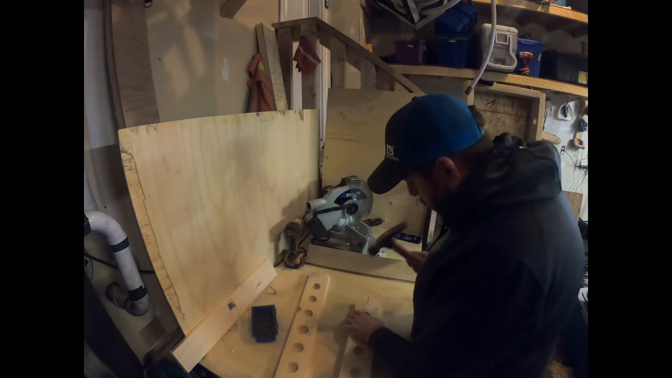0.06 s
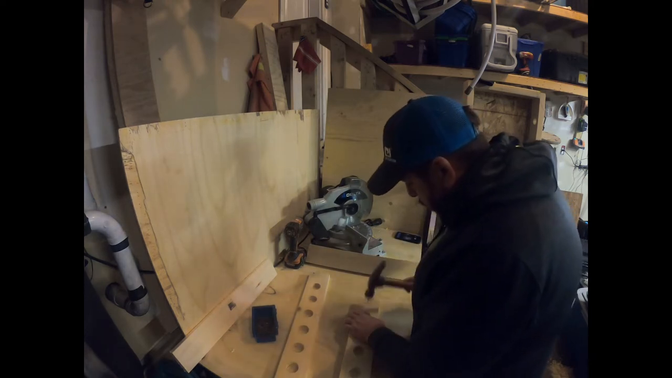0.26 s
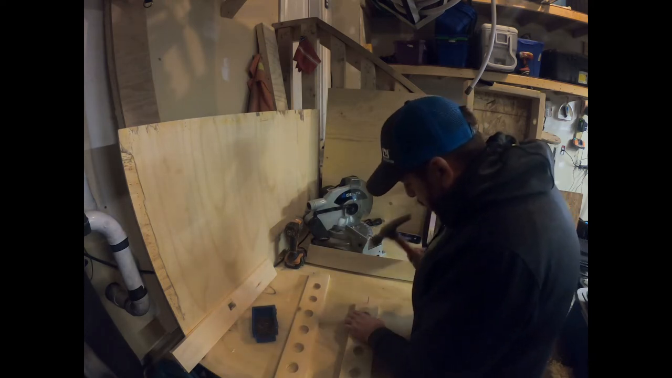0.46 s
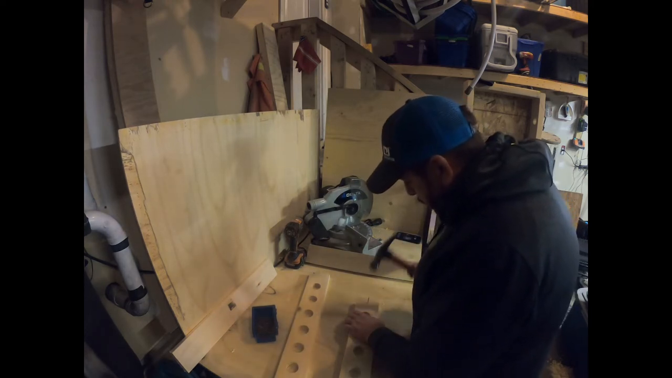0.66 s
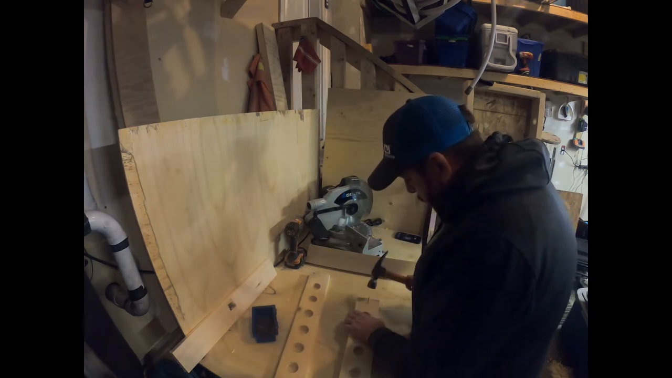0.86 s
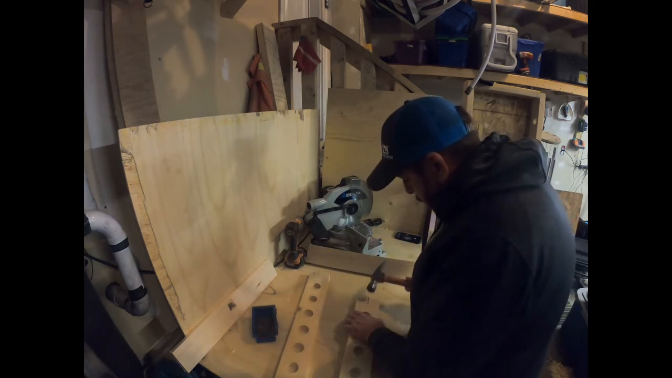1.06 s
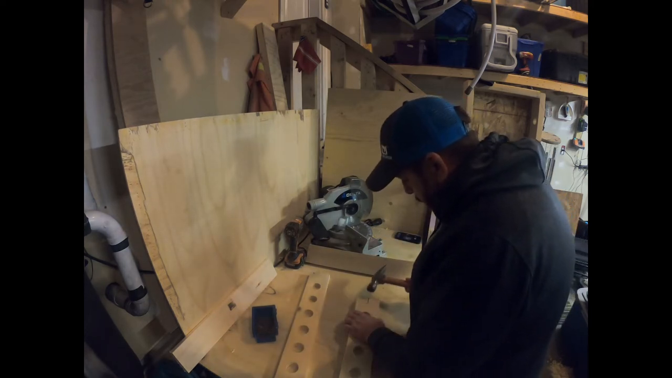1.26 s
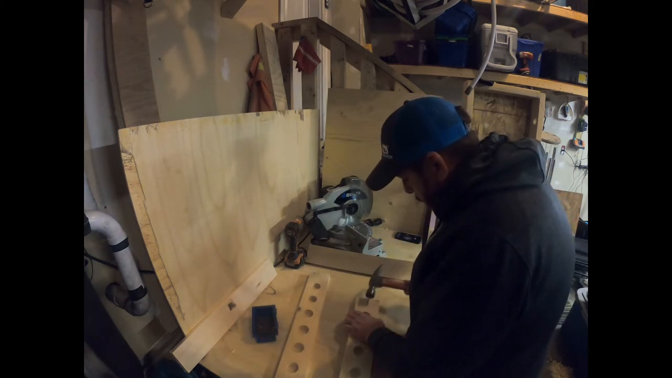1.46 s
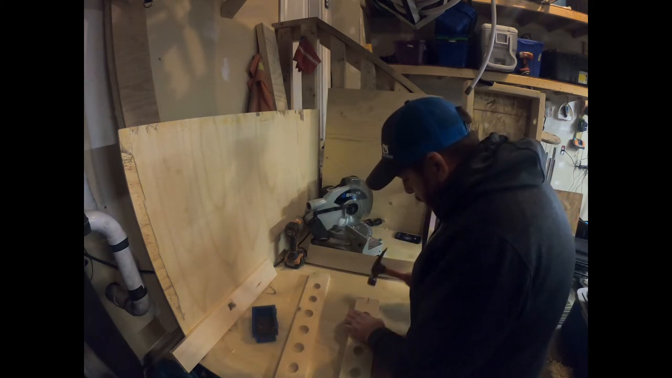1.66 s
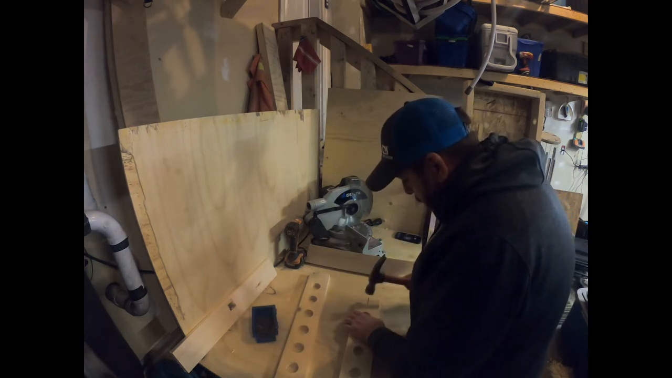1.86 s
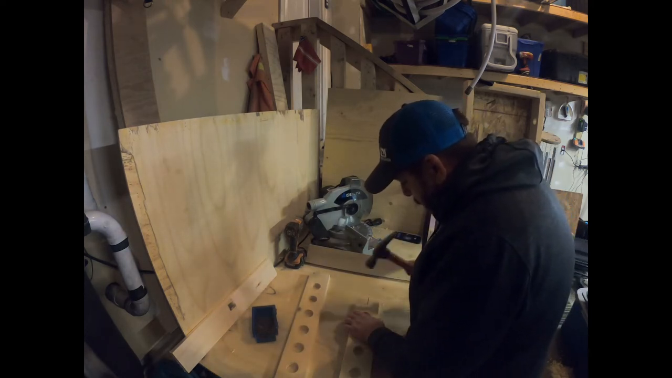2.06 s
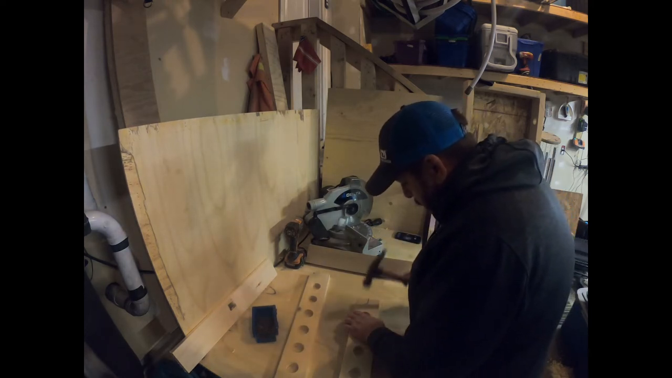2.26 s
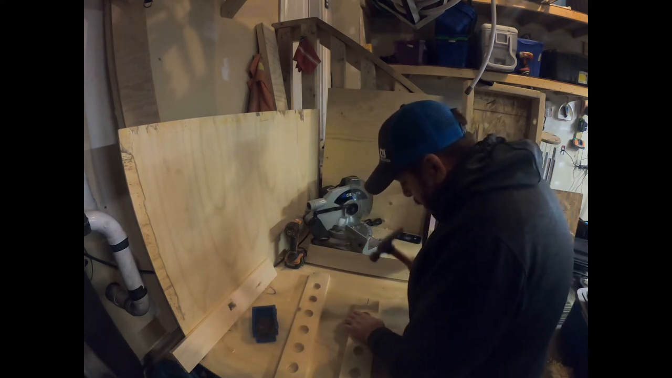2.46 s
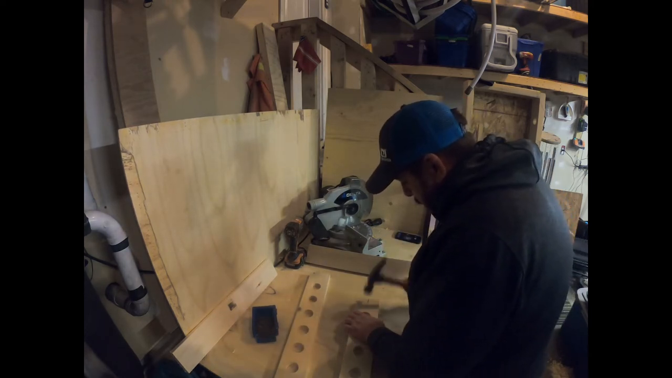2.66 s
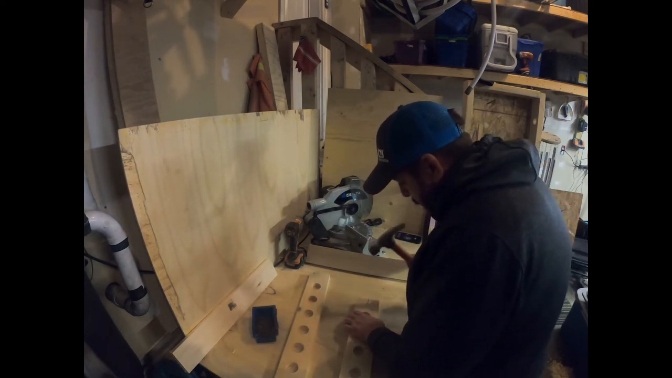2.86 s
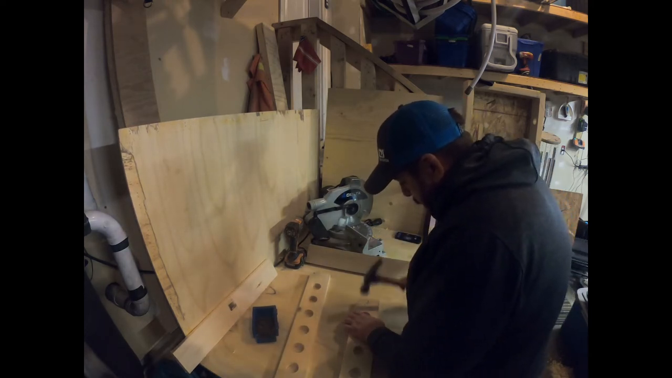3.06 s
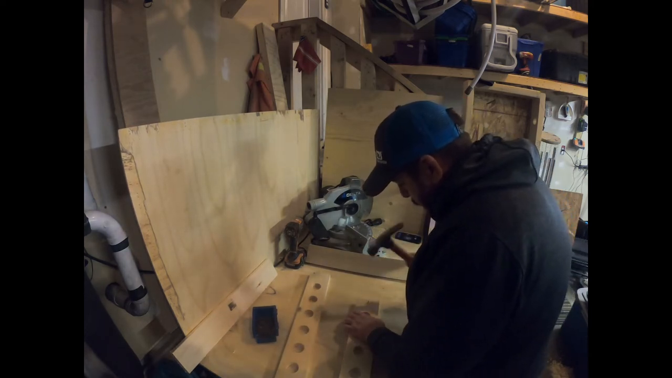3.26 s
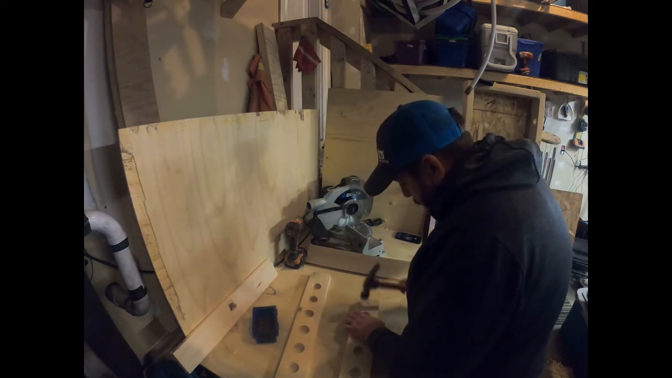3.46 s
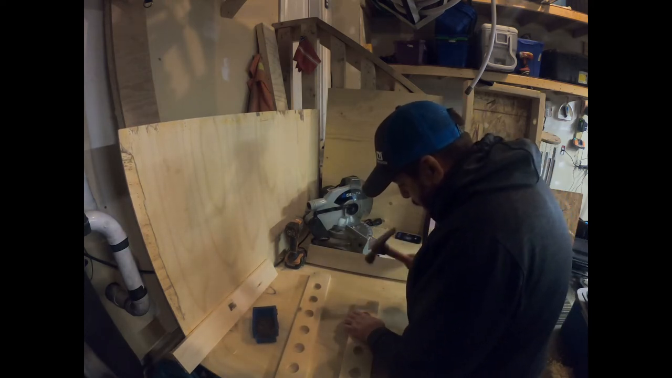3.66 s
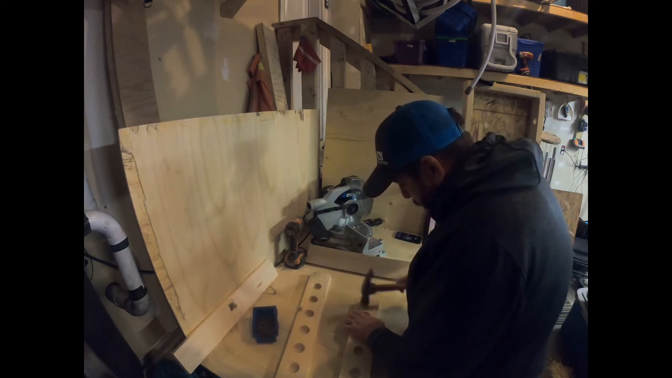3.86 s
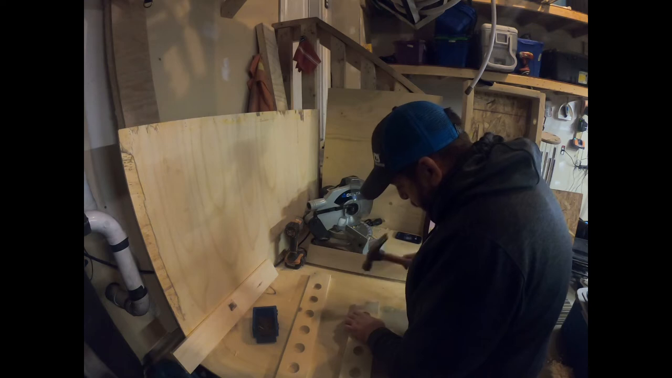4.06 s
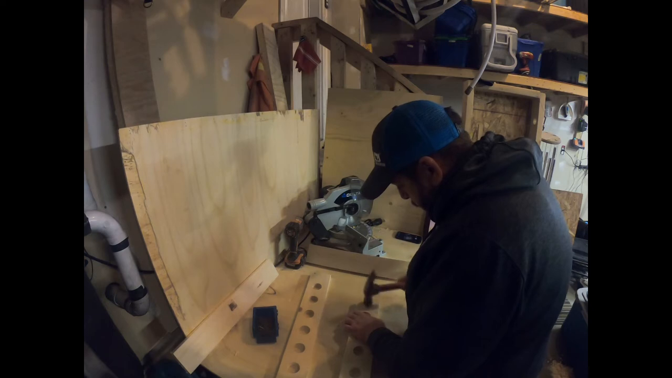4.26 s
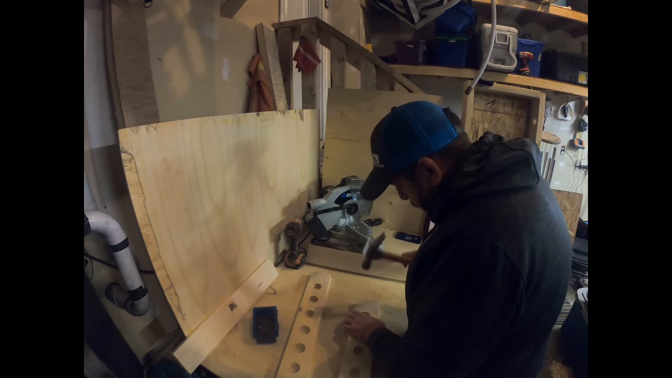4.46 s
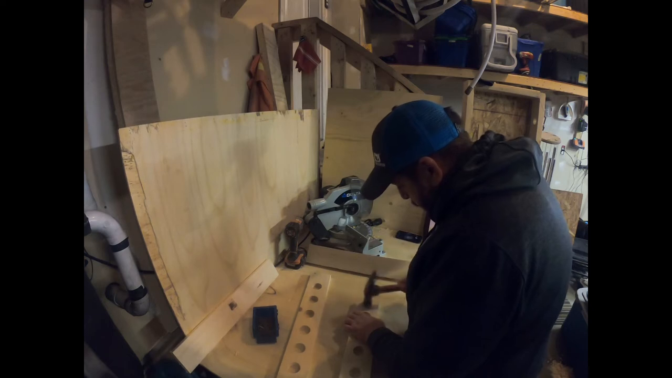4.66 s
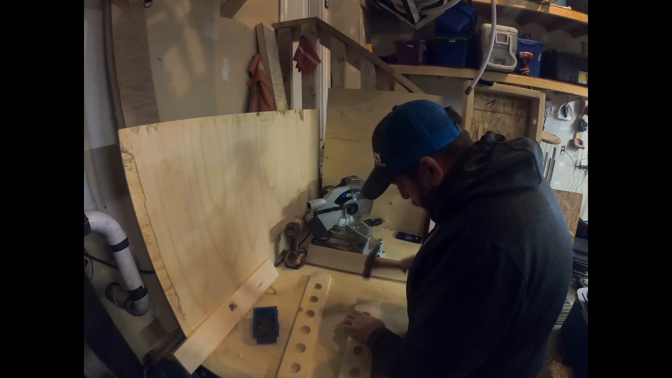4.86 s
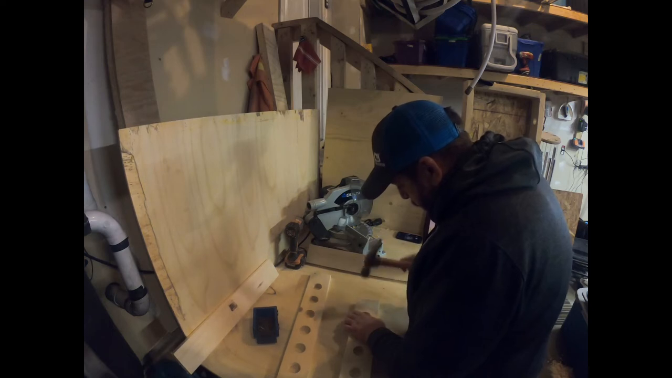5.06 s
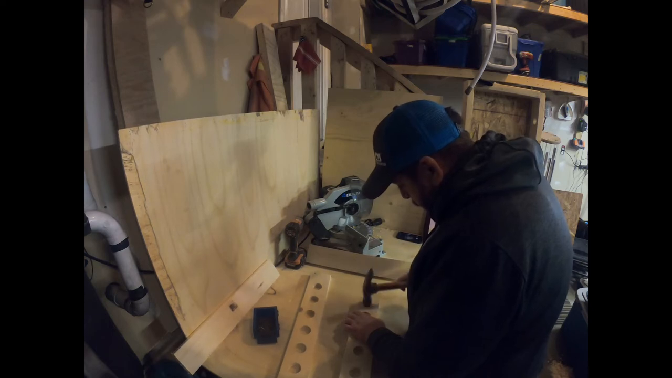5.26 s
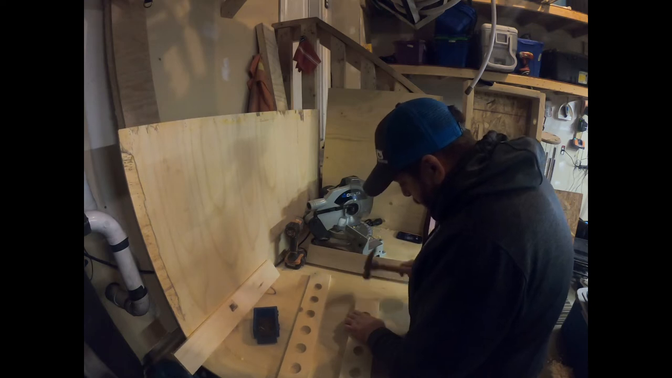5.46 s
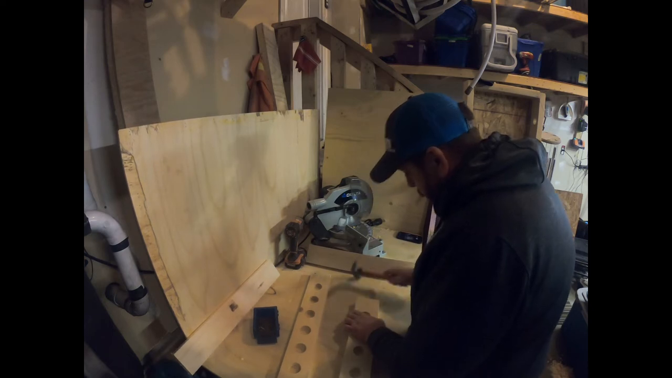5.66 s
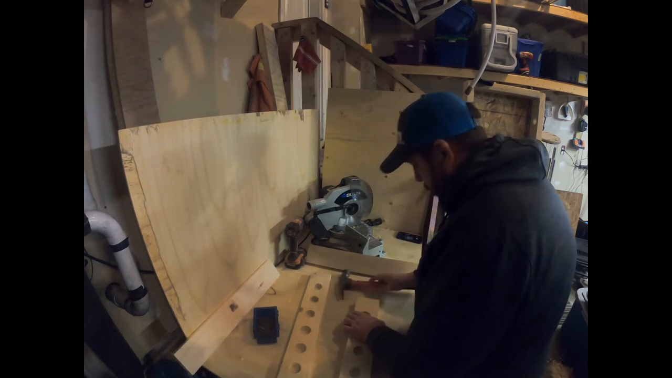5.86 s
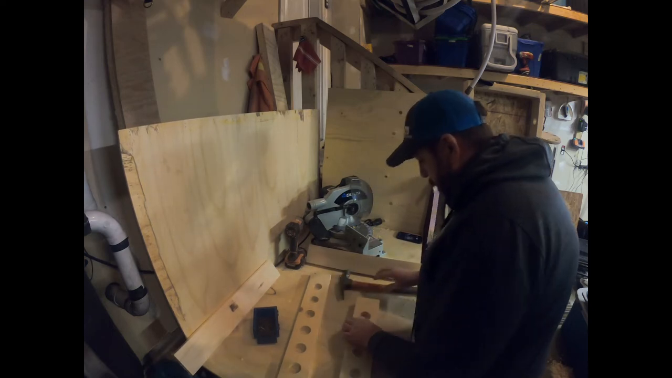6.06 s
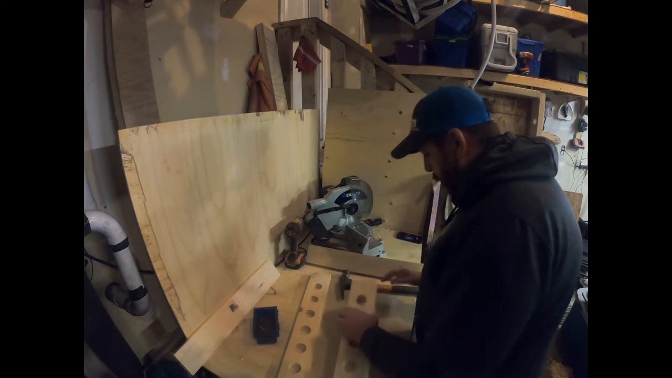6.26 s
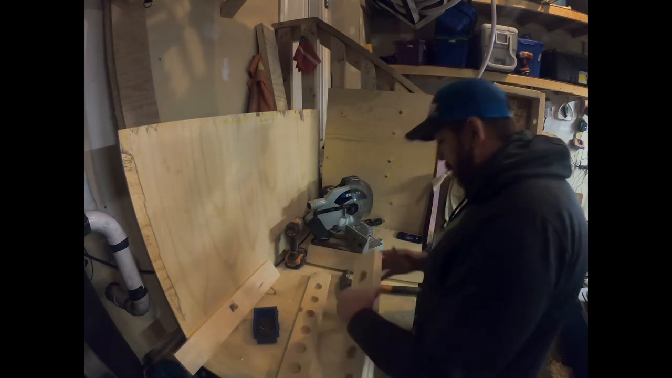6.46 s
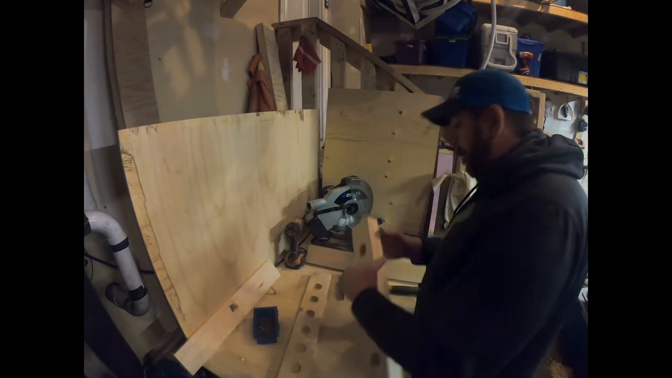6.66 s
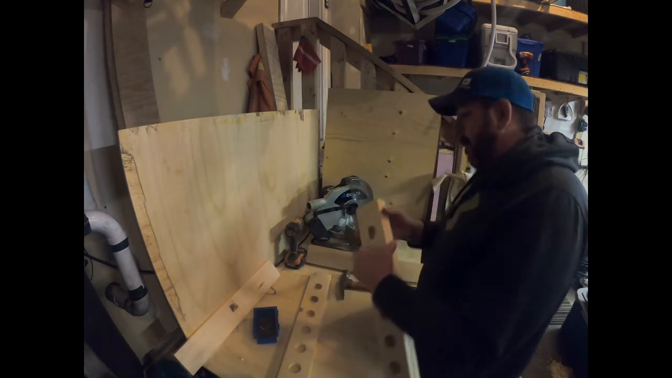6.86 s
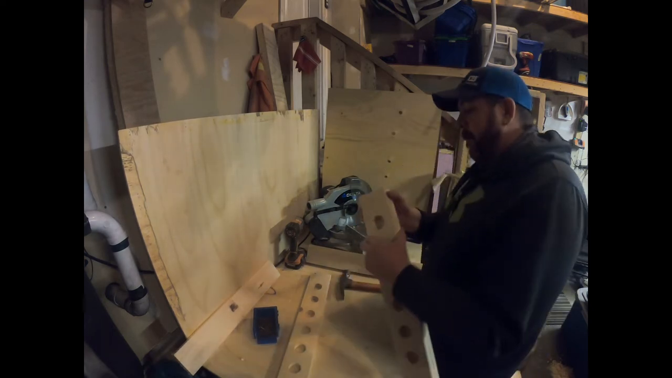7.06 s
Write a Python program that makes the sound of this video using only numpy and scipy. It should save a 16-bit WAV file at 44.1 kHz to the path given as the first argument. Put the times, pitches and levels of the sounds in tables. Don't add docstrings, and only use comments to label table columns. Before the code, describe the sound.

Nailing on a bench, picked up by a small stereo recorder nearby with faint hiss and a low room drone. Blows crack, thump and rattle the loose board, with short woody room tails, slightly squashed and dull on top. After one blow and two soft taps comes a steady run, the last blow softer-edged. The hammer knocks down on the bench, and wood drags away among rustling clothes.

```python
import sys
import numpy as np
from scipy import signal
from scipy.fft import rfft, irfft
from scipy.io import wavfile
from scipy.ndimage import uniform_filter1d

SR = 44100
rng = np.random.default_rng(int(sys.argv[2]) if len(sys.argv) > 2 else 0)


def ratio(d):
    e = np.asarray(d, float) / 20
    return 10 ** e


def wav_out(sig):
    wavfile.write(sys.argv[1], SR, np.round(np.clip(np.atleast_2d(sig).T, -1, 1) * 32767).astype(np.int16))


N = 313110

# pitch_hz, t60_s
ROOM_T60 = [(60, 0.52), (110, 0.74), (150, 0.54), (280, 0.56), (400, 0.39), (1000, 0.41), (3000, 0.44),
            (8000, 0.29)]
# pitch_hz, correlation
LIKENESS = [(40, .997), (170, .996), (350, .97), (700, .73), (1400, .56), (2800, .74), (5600, .3),
            (10000, -.07), (14000, -.3)]
# pitch_hz, left_minus_right_db
LEAN = [(100, 0), (350, 0), (700, -2.2), (1400, 0.4), (2800, -1.5), (5600, 1.5), (10000, -0.5),
        (14000, -1.3)]
# start_s, strength_db, weight_db (mass behind it), hardness_db (of contact)
FULL = [
    (0.2485, -14, 2, -2),
    (2.2075, -13, -1, -2),
    (2.6225, -16.5, 2.5, 1.5),
    (3.024, -16.5, 1.5, 2.5),
    (3.4275, -16.5, 2.5, 0.5),
    (3.836, -16, 0, 0),
    (4.2435, -15, 0, -.5),
    (4.6705, -13.5, -4, -1.5),
    (5.197, -11, -7.5, -4.5),
]
# start_s, strength_db, weight_db, hardness_db, knock_over_strength_db
TAPS = [
    (1.1752, -22, -11, -3, -4),
    (1.4909, -23.5, 7, 2, 5),
]
# start_s, strength_db, weight_db, hardness_db, knock_over_strength_db
DROPS = [
    (5.711, -18.5, -1, -2, 10),
    (5.8285, -21, -2, -8, 6),
    (5.8915, -9, -4, 5.5, -1),
    (6.007, -13, 5, -3, -3),
    (6.565, -72, 27, 3, 4),
]
# thump_db, bench_db, board_db, crack_db, tick_db
FULL_PARTS = (-1.5, 0.5, 0, 2.5, -13)
TAP_PARTS = (-18, -4, 0, -3, -10.5)
DROP_PARTS = (-17.5, -1.5, -0.5, -10.5, -26.5)


def blow_levels(rows, parts_db, ring_share):
    blows = []
    for s, strength, weight, hard, *knock in rows:
        levels_db = strength + np.array(parts_db) + [weight, 0.33 * weight, 0, hard, 0.72 * hard]
        knock_db = strength + (knock[0] if knock else -150)
        blows.append((s, ring_share, *levels_db, knock_db))
    return blows


FULL_BLOWS = blow_levels(FULL, FULL_PARTS, 1.02)
BLOWS = FULL_BLOWS + blow_levels(TAPS, TAP_PARTS, .76) + blow_levels(DROPS, DROP_PARTS, .67)
START_S, RING_SHARE, THUMP_DB, BENCH_DB, BOARD_DB, CRACK_DB, TICK_DB, KNOCK_DB = np.transpose(BLOWS)
IS_FULL = RING_SHARE > .9
IS_TAP = np.isin(START_S, np.array(TAPS)[:, 0])


def at_hz(points, hz):
    table = np.array(points)
    return np.interp(np.log(hz), np.log(table[:, 0]), table[:, 1])


def rms_one(x):
    return x / np.sqrt(np.mean(x ** 2) + 1e-20)


def drift(rate, size):
    r = np.exp(-64 * np.pi * rate / SR)
    slow = signal.lfilter([1], [1, -2 * r, r * r], rng.standard_normal(size // 32 + 1002))
    slow = rms_one(slow[1000:])
    return np.interp(np.arange(size) / 32, np.arange(len(slow)), slow)


def band_filter(x, order, cut_hz, kind):
    return signal.sosfilt(signal.butter(order, cut_hz, kind, fs=SR, output="sos"), x)


def bands(size, patchy_db=0.):
    edges = 32 * 2 ** np.arange(0, 9.1, .5)
    white = rng.standard_normal((2, 2, size))
    flicker = [drift(42.0, size) for k in range(3)]
    for k, (low, high) in enumerate(zip(edges, edges[1:])):
        mid, side = band_filter(white[k % 2], 2, [low, high], "band")
        hz = np.sqrt(low * high)
        alike = np.clip(at_hz(LIKENESS, hz), -1, 1)
        lean_db = at_hz(LEAN, hz) / 2 * np.array([[1], [-1]])
        gain = ratio(patchy_db * flicker[k % 3] + lean_db)
        yield hz, gain * (np.sqrt(1 + alike) * mid + np.sqrt(1 - alike) * side * [[1], [-1]])


def coloured(spectrum, patchy_db):
    return rms_one(sum(ratio(at_hz(spectrum, hz)) * noise for hz, noise in bands(N, patchy_db)))


def resonate(x, hz, width_hz):
    r = np.exp(-np.pi * width_hz / SR)
    return rms_one(signal.lfilter([1, 0, -1], [1, -2 * r * np.cos(2 * np.pi * hz / SR), r * r], x))


def strike(modes, levels_db, late_s, rise_s, vary_db, detune, turn_by=np.pi):
    out = np.zeros((2, N + SR))
    t = np.arange(SR)[:, None] / SR
    hz, db, t60 = np.transpose(modes)
    apart = np.arccos(np.clip(at_hz(LIKENESS, hz), -1, 1)) * rng.choice([-.5, .5], len(modes))
    turn = turn_by * np.arange(len(modes))
    for s, share, level_db in zip(START_S, RING_SHARE, levels_db):
        strength, pitch = rng.standard_normal((2, len(modes)))
        if level_db < -120:
            continue
        span = t[:round(min(share * t60.max(), 1) * SR)]
        turning = 2j * np.pi * hz * (1 + detune * pitch)
        dying = np.log(1000) / (share * t60)
        rings = np.exp(span * (turning - dying)) * (1 - np.exp(-span / rise_s))
        at = round((s + late_s) * SR)
        for ear, sign in enumerate((1, -1)):
            gain = ratio(level_db + db + vary_db * strength + sign * at_hz(LEAN, hz) / 2)
            phase = np.exp(1j * (turn + sign * apart))
            out[ear, at:at + len(span)] += np.imag(rings @ (gain * phase))
    return out[:, :N]


def air():
    # pitch_hz, level_db (per Hz)
    hiss_colour = [(30, 4), (60, -3), (100, -11), (250, -3), (450, -13), (650, -4.5), (1000, -13.5),
                   (3000, -21.5), (6500, -23.5), (8000, -15.5), (9200, -22.5), (11000, -15.5),
                   (15000, -23.5)]
    hiss_db, drone_db, drone_t60_s = -76, -76, 2.6
    t = np.arange(N) / SR
    power = ratio(drone_db - 13.5 * np.maximum(t - 5.9, 0)) ** 2
    power = power + ratio(-64 - 60 * t / drone_t60_s) ** 2
    for s, share, thump_db, *rest in FULL_BLOWS:
        power = power + (t > s) * ratio(thump_db - 35 - 60 * np.abs(t - s) / drone_t60_s) ** 2
    drone = resonate(resonate(rng.standard_normal(N), hz=152, width_hz=32), hz=155, width_hz=79)
    drone = band_filter(drone, 4, 135, "high")
    sizzle = resonate(rng.standard_normal((2, N)), hz=8150, width_hz=920)
    hiss = coloured(hiss_colour, patchy_db=3.0)
    return ratio(hiss_db - 8.5) * sizzle + ratio(hiss_db) * hiss + np.sqrt(power) * drone


def tick_and_crack():
    # pitch_hz, level_db, t60_s
    tick_modes = [(4500, 1, 0.0087), (5115, -4.5, 0.0094), (6300, 0, 0.014), (7050, 4, 0.0053),
                  (8200, -5, 0.0059), (8340, -4, 0.012), (8740, -3, 0.0082), (10400, -5.5, 0.0022),
                  (13560, -2.5, .005)]
    # pitch_hz, level_db, t60_s
    crack_modes = [(1830, -0.5, 0.011), (2176, -7.5, 0.054), (2609, 4, 0.0055), (2930, 2.5, 0.0093),
                   (3425, -12.5, 0.016), (3690, -10.5, 0.017)]
    tick = strike(tick_modes, TICK_DB + 5.0, late_s=.0001, rise_s=0.00039, vary_db=4.0, detune=0.014)
    crack = strike(crack_modes, CRACK_DB + 4.5, late_s=.0001, rise_s=.0005, vary_db=0.87, detune=0.023)
    sharp = ratio(1.8 * np.array([[1], [-1]])) * tick + crack
    return sharp + ratio(-0.5) * np.roll(sharp, round(0.001193 * SR), axis=1)


def hammer_face():
    # pitch_hz, level_db, t60_s
    face_modes = [(690, 1.5, 0.02), (560, -4, 0.017)]
    face_db = BOARD_DB - 3 + 1.8 * (BOARD_DB - CRACK_DB)
    return strike(face_modes, np.where(IS_FULL, face_db, -150), late_s=0.00042, rise_s=.0005, vary_db=2.0, detune=.02)


def nail_song():
    # pitch_hz, level_db, t60_s
    nail_modes = [(1440, -1, .9), (2930, -2.5, 1)]
    song_db = CRACK_DB - 62 + 4.9 * START_S
    return strike(nail_modes, np.where(IS_FULL, song_db, -150), late_s=.001, rise_s=.002, vary_db=2.5, detune=.002)


def board():
    # pitch_hz, level_db, t60_s
    board_modes = [(366, -9, 0.034), (406, -5, 0.09), (510, -2, 0.048), (600.4, 0, 0.069), (730, -5, 0.096),
                   (834.4, -3.5, 0.093), (927, 0.5, 0.022), (1214, 3, 0.048), (1443, -8, .05),
                   (1560, -7, 0.063)]
    # pitch_hz, level_db, t60_s
    loose_modes = [(1287, 2, .2), (738, -5, .18), (930, -7, .2), (1960, -9, .2), (6000, -16, .22)]
    loose_db = np.where(IS_TAP, BOARD_DB - 3, -150)
    return (strike(board_modes, BOARD_DB - 5.0, late_s=0.00023, rise_s=0.0012, vary_db=3.5, detune=.01)
            + strike(loose_modes, loose_db, late_s=.008, rise_s=.03, vary_db=1, detune=.004))


def bench():
    # pitch_hz, level_db, t60_s
    bench_modes = [(135.2, -4, 0.52), (150.2, 2, .3), (158.7, -16, 0.76), (168, -4, 0.15),
                   (214, -9.5, 0.37), (254.8, -5.5, 0.44), (298, -14.5, 0.63)]
    # pitch_hz, level_db, t60_s
    thump_modes = [(46.7, -8.5, 0.3), (73.3, 0.5, 0.24), (95.6, 0, 0.2)]
    # pitch_hz, level_db, t60_s
    knock_modes = [(163, -1, 0.15), (245, -4, .1), (380, -6, 0.041), (695, -12, 0.051)]
    top_db = BENCH_DB - 3.5 - 7 * ~IS_FULL
    return (strike(knock_modes, KNOCK_DB, late_s=0.0013, rise_s=0.0012, vary_db=1.5, detune=0.017, turn_by=0)
            + strike(bench_modes, top_db, late_s=.003, rise_s=0.0021, vary_db=1.27, detune=0.015, turn_by=0)
            + strike(thump_modes, THUMP_DB + .5, late_s=0.0023, rise_s=0.0011, vary_db=2.07, detune=0.041, turn_by=0))


def reverberation():
    part_hz = [65, 190, 700, 2500, 7000]
    # pitch_hz, level_db
    tail_colour = [(32, -21.5), (60, -14.5), (150, -13), (300, -10.5), (600, -12.5), (1000, -13),
                   (2000, -16), (3500, -16), (6000, -12), (9000, -7.5), (13000, -19.5)]
    out, step = 0, 16
    t = np.arange(0, SR, step) / SR
    swell = 1 - np.exp(-t / .005)
    for hz, noise in bands(N, patchy_db=1.5):
        power = np.zeros((N + SR) // step + 1)
        for s, share, *parts_db in BLOWS:
            level_db = at_hz(list(zip(part_hz, parts_db)), hz) + at_hz(tail_colour, hz)
            age = t / (share * at_hz(ROOM_T60, hz))
            dying = ratio(level_db - 56.75 * age - 24 * age ** 3.2) * swell
            power[round(s * SR / step):][:len(t)] += dying ** 2
        out = out + np.repeat(np.sqrt(power), step)[:N] * rms_one(noise)
    return out


def clatter():
    # start_s, peak_db
    landings = [
        (0.3048, -18),
        (2.2682, -17),
        (2.6851, -20),
        (3.0987, -19.5),
        (3.5002, -17.5),
        (3.9177, -16.5),
        (4.3208, -18.5),
        (4.753, -18.5),
        (5.249, -26),
    ]
    # start_s, peak_db, dull_db
    rattles = [
        (0.3131, -25.5, -8.5),
        (0.9266, -74, -10),
        (4.2768, -36.5, 12),
        (4.9681, -48.5, -6),
        (5.045, -55, 3),
        (5.7211, -30.5, 5),
        (5.832, -39.5, 3.5),
        (6.0199, -40, 3),
        (6.478, -42, -19),
    ]
    # pitch_hz, level_db
    contact_colour = [(300, 1), (1000, -4.5), (3000, 3), (6000, -5), (9000, -8), (11000, -18.5),
                      (15000, -12.5)]
    loudness = ratio(2.3 * np.minimum(rng.exponential(1, N), 4))
    grains = rng.standard_normal(N) * loudness * (rng.random(N) < .3)
    hz = np.fft.rfftfreq(N, 1 / SR) + 1
    bright = rms_one(irfft(rfft(grains) * ratio(at_hz(contact_colour, hz)), N))
    dull = rms_one(band_filter(grains, 2, [250, 1500], "band"))
    out, t = np.zeros(N), np.arange(SR // 8) / SR
    touches = [(*row, -3, 0.0095) for row in landings] + [(*row, 0.013) for row in rattles]
    for s, peak_db, dull_db, spread_s in touches:
        at = round((s - .002) * SR)
        shape = (1 - np.exp(-t / 0.0024)) * np.exp(-t / spread_s)
        out[at:at + len(t)] += ratio(peak_db) * shape * (bright + ratio(dull_db) * dull)[at:at + len(t)]
    return out


def workshop(x):
    # pitch_hz, level_db
    room_colour = [(60, -20), (200, -1.5), (600, 3), (1500, -1), (3500, -4), (6000, -4), (9000, 6),
                   (13000, 8)]
    t = np.arange(SR) / SR
    response = sum(ratio(at_hz(room_colour, hz) - 60 * t / at_hz(ROOM_T60, hz)) * noise for hz, noise in bands(SR))
    response = response * (1 - np.exp(-t / 0.0017))
    return signal.fftconvolve(x[None], response / np.sqrt(np.sum(response ** 2) / 2), axes=1)[:, :N]


def clothes():
    # start_s, level_db
    moving = [
        (4.8, -82),
        (5.0, -78),
        (5.15, -78),
        (5.6, -71),
        (6.44, -67),
        (6.51, -58),
        (6.6, -68.5),
        (6.85, -65),
        (7.1, -73),
    ]
    # pitch_hz, level_db (per Hz)
    cloth_colour = [(88, -56), (150, -9), (318, -4.5), (604, -6.5), (810, -3.5), (3640, -8), (8470, -17.5),
                    (12000, -43), (15600, -73), (22000, -120)]
    moving_db = np.interp(np.arange(N) / SR, *np.transpose(moving), left=-140)
    return ratio(moving_db + 4.5) * coloured(cloth_colour, patchy_db=1.7)


def slide():
    # start_s, length_s, scrape_db, low_squeak_db, high_squeak_db
    strokes = [
        (6.295, .14, -57.5, -63, -86),
        (6.421, 0.17, -52, -55.5, -67.5),
        (6.677, .14, -76.5, -76, -62.5),
        (6.797, 0.12, -65.5, -78, -75),
    ]
    # pitch_hz, width_hz, level_db
    slide_modes = [(206, 61, -4.5), (320, 92, 2.5), (520, 63, -11), (770, 60, -3.5), (1300, 390, -6)]
    # pitch_hz, width_hz
    squeak_modes = [(2480, 80), (3600, 70)]
    start, length, *levels_db = np.transpose(strokes)
    progress = np.clip((np.arange(N)[:, None] / SR - start) / length, 0, 1)
    push = np.sin(np.pi * progress) ** 1.03
    scrape, *squeak = (push @ ratio(db) for db in levels_db)
    clicks = rng.random(N) < 2500 / SR
    grit = rng.standard_normal(N) * clicks * ratio(3.5 * drift(60., N))
    rubbed = rms_one(sum(ratio(db) * resonate(grit, hz, width_hz) for hz, width_hz, db in slide_modes))
    squeaks = sum(ratio(-3.5) * gain * resonate(grit, *mode) for gain, mode in zip(squeak, squeak_modes))
    return ratio(-4.5) * scrape * rubbed + squeaks


def scene():
    blows = tick_and_crack() + hammer_face() + nail_song() + board() + bench()
    small = clatter() + slide()
    in_room = ratio(-1.5) * small + ratio(0.5) * workshop(small)
    return air() + blows + reverberation() + in_room + clothes()


def top_cut(x):
    return signal.sosfilt(signal.butter(12, 16470, fs=SR, output="sos"), x)


def record(dry):
    step = round(.0108 * SR)
    leak = band_filter(dry, 1, 2500, "low")
    x = dry + ratio(-20.0) * np.roll(leak, -step, axis=1) + ratio(-31.5) * np.roll(leak, -2 * step, axis=1)
    x = ratio(-26.0) * x + band_filter(x, 6, 9400, "low")
    x = band_filter(x, 4, 38, "high")
    bass = signal.sosfiltfilt(signal.butter(3, 125, fs=SR, output="sos"), x)
    power = uniform_filter1d(np.mean(bass ** 2, axis=0), size=2000)
    shut = 1 / (1 + power / ratio(-56.5) ** 2)
    x = x - .6 * shut * bass
    x = 2.595 * np.tanh(x / 2.408)
    return top_cut(x)


dry = scene()
out = record(dry)
wav_out(out)
```